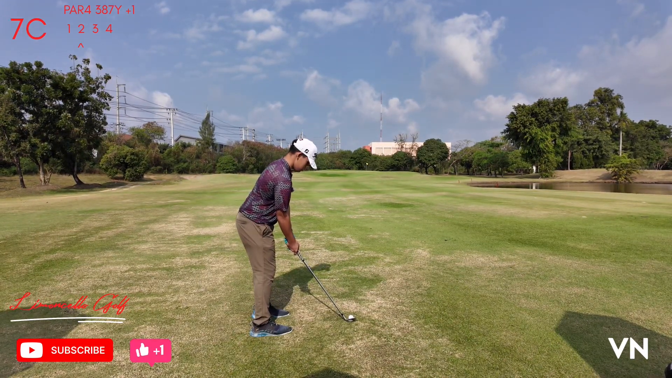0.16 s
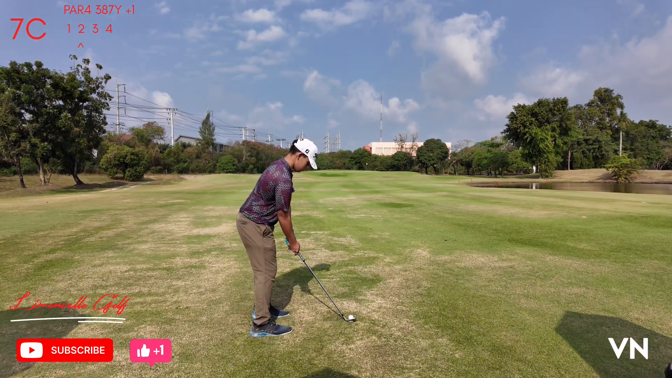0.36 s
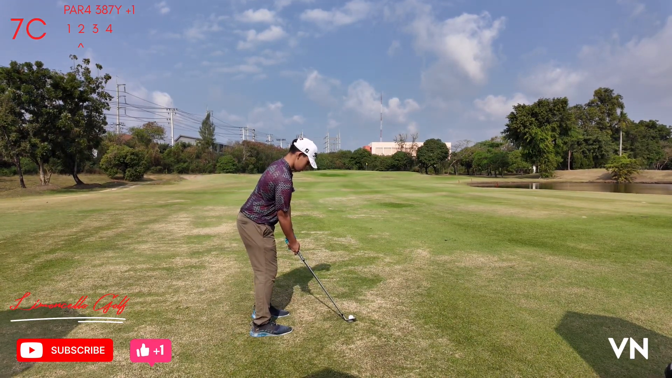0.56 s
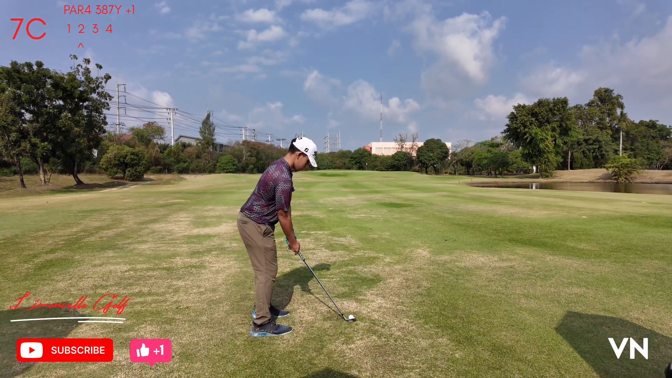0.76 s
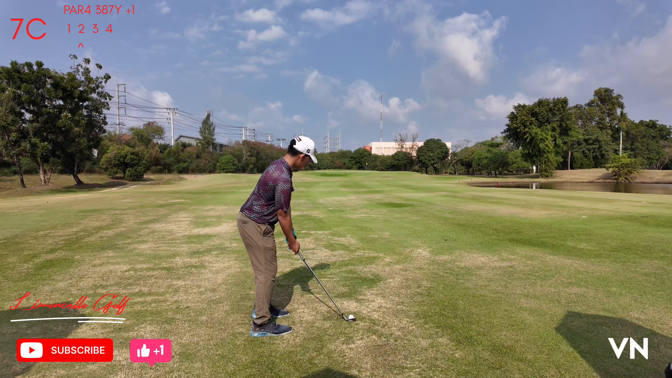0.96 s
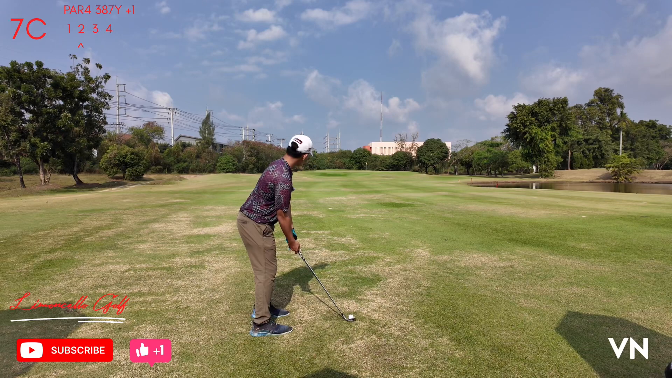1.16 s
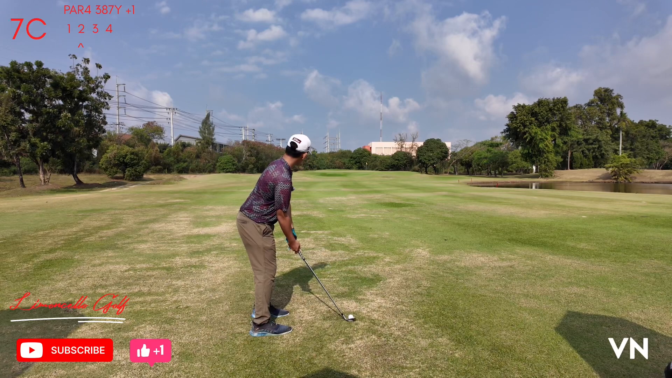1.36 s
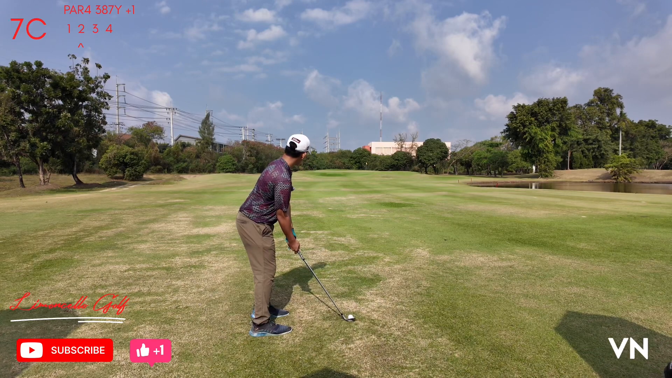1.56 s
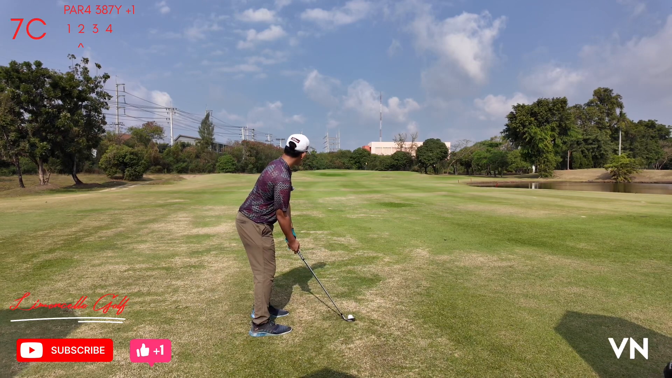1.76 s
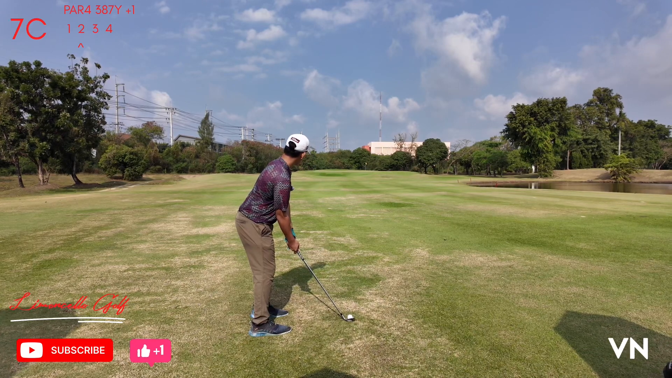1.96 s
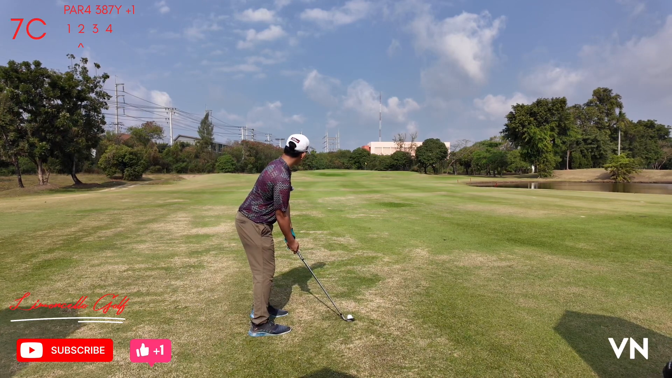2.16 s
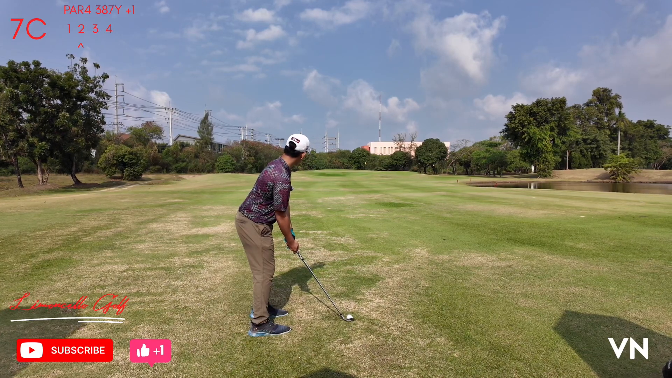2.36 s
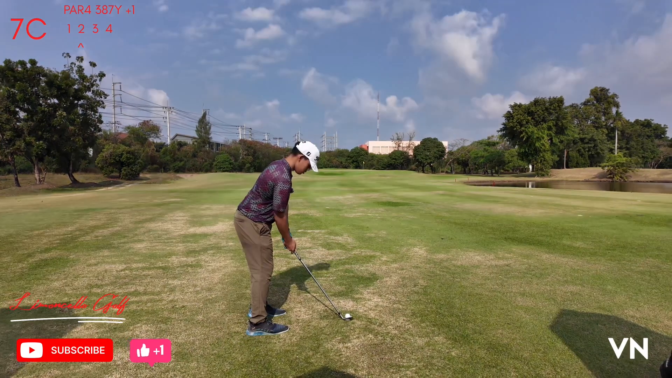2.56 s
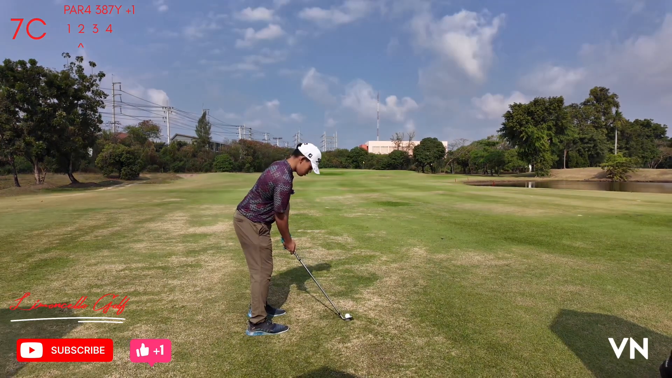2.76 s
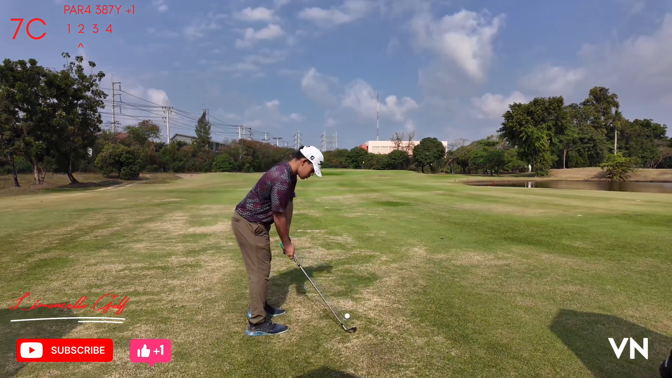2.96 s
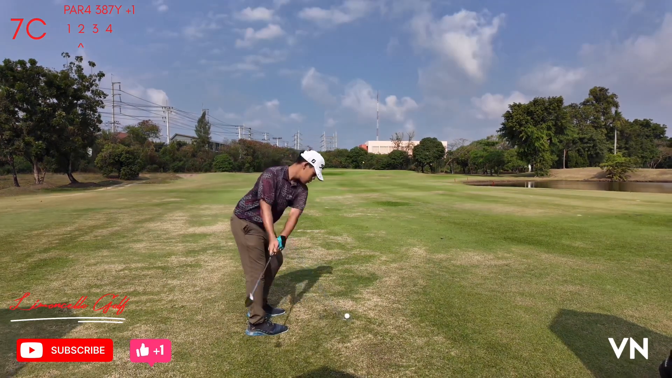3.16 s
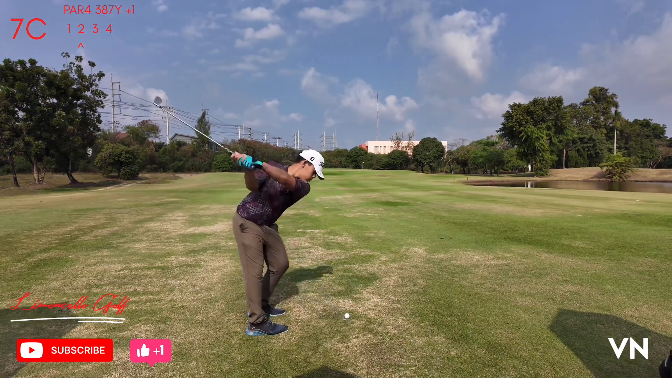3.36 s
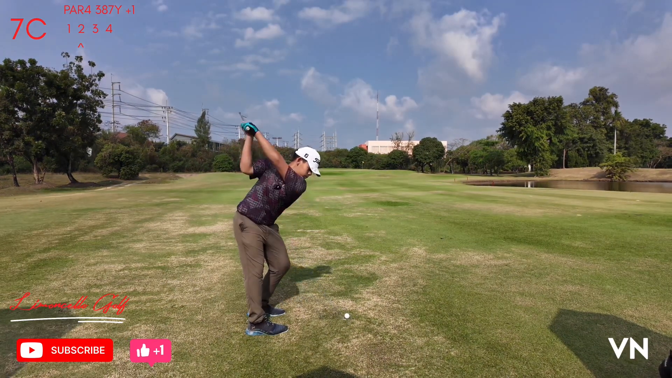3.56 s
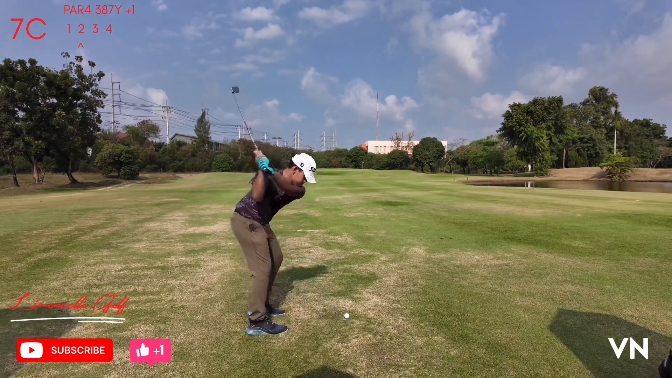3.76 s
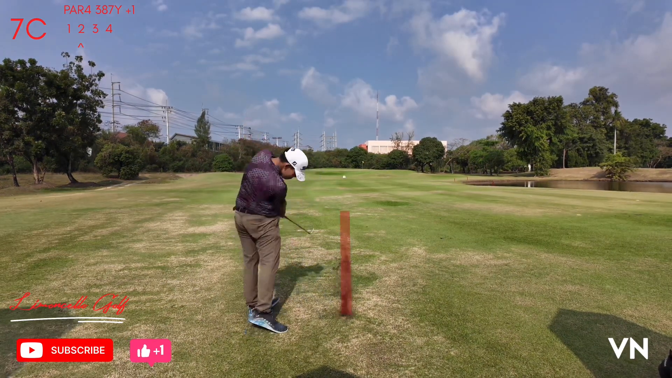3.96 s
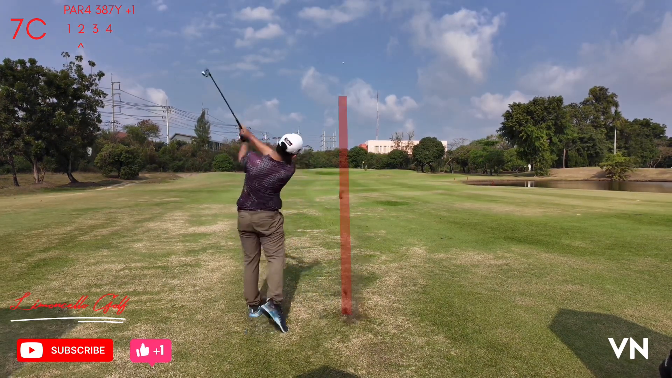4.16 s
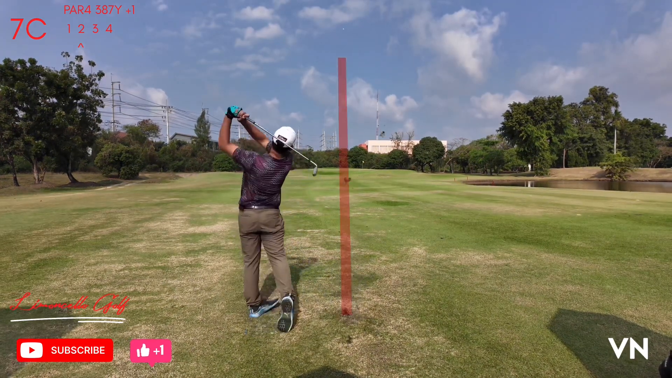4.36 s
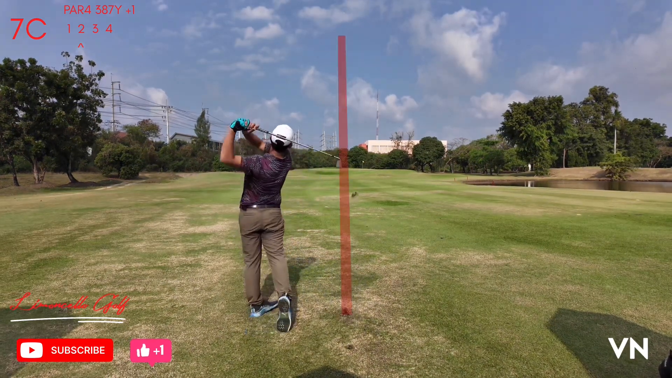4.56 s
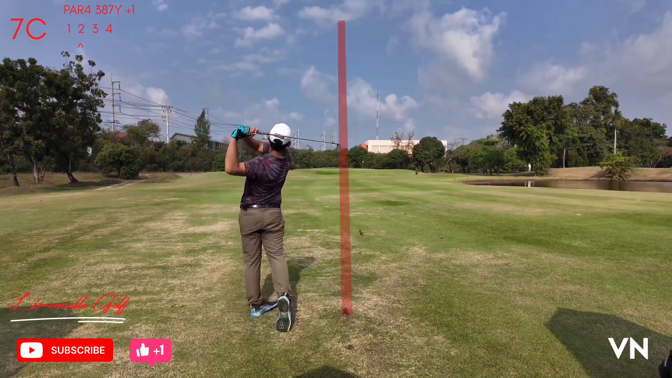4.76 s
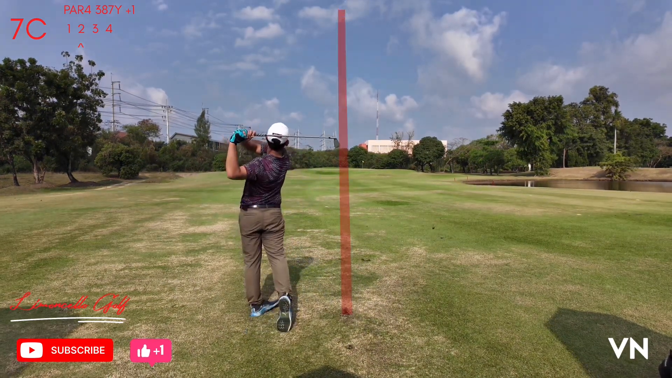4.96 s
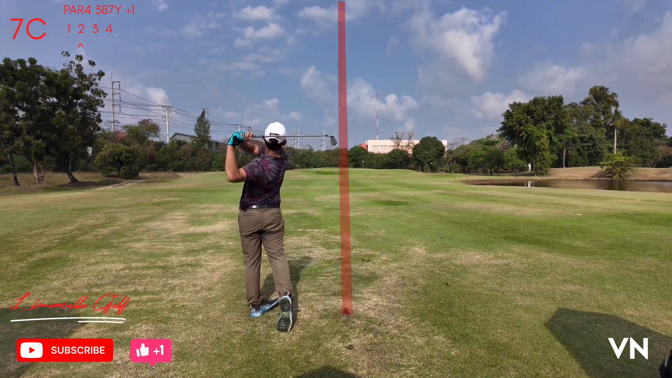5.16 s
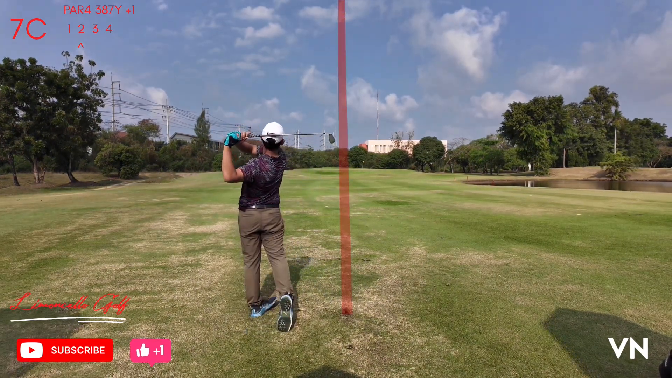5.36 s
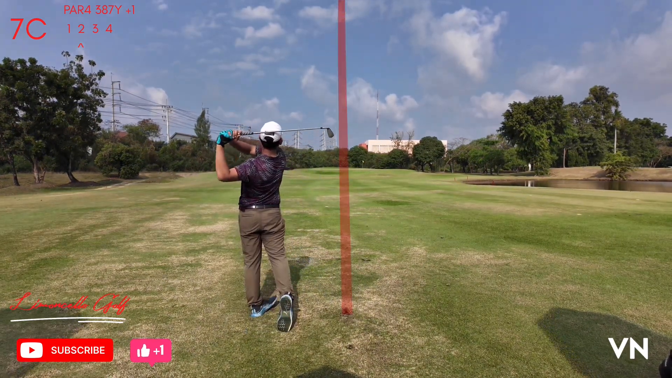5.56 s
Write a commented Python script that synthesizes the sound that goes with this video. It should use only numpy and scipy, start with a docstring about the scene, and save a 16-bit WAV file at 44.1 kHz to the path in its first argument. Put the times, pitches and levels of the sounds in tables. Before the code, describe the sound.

A golf iron swishes and cracks a ball off turf, after faint birdsong and a distant engine drone outdoors.

```python
"""On a golf fairway, wind and far traffic murmur, birds chirp, and a far engine drones, then slows.
The sound drops out for a moment and comes back quieter; a far roar and machine hums swell in.
Clothes rustle, and the club's shaft whistles as it sheds swirls of air on its way down.
The iron head rings briefly as it cracks the ball and cuts the turf.
Last, a clod thuds onto the grass and shoes scuff."""
import sys
import numpy as np
from scipy import signal
from scipy.io import wavfile
from scipy.ndimage import uniform_filter1d

SR = 44100
rng = np.random.default_rng(int(sys.argv[2]) if len(sys.argv) > 2 else 0)


def to_wav(sig):
    """Store sig (one row per channel, or 1-D mono) as 16-bit WAV at the path in sys.argv[1].

    Samples outside -1..1 are clipped; the rate is SR.
    """
    pcm = np.clip(np.atleast_2d(sig), -1, 1) * 32767
    pcm = np.round(pcm).astype(np.int16)
    wavfile.write(sys.argv[1], SR, pcm.T)  # frames by channels


N = 247401
DROP_S, BACK_S = 2.398, 2.446  # the sound drops out, then comes back
# tone colour shared by the swing's whoosh and the scuffs (pitch [Hz], level [dB])
DULL_COLOUR = [(59, -33), (100, -7), (273, -3.5), (377, -3), (538, -3), (829, -16.5), (2260, -24),
               (4000, -34.5), (5200, -63), (8800, -120)]


def amp(db):
    """Turns decibels into a number to multiply a sound by."""
    return 10 ** (np.asarray(db) / 20)


def unit_level(x):
    """Scales a signal so that its average strength (rms) is 1."""
    return x / np.sqrt(np.mean(x ** 2) + 1e-20)


def add(mix, start_s, sound):
    """Lays a sound into the mix at its start time."""
    part = mix[round(start_s * SR):][:len(sound)]
    part += sound[:len(part)]


def wander(span_s):
    """A smooth random wobble; a longer span makes it slower."""
    size = max(int(span_s * SR), 1)
    return unit_level(uniform_filter1d(uniform_filter1d(rng.standard_normal(N), size), size))


def noise(colour, patchy_db, flicker_db):
    """Noise of a given tone colour: patches of pitch come and go, and the whole level flickers."""
    frames, hz = N // 256 + 5, np.fft.rfftfreq(1024, 1 / SR)
    real, imag, patches = rng.standard_normal((frames, 513, 3)).T
    patches = unit_level(uniform_filter1d(uniform_filter1d(patches, size=12, axis=0), size=14, axis=1))
    points_hz, points_db = np.transpose(colour)
    colour_db = np.interp(np.log(hz + 1), np.log(points_hz + 1), points_db)[:, None]
    gain = amp(colour_db + patchy_db * patches + flicker_db * rng.standard_normal(frames))
    return unit_level(signal.istft((real + 1j * imag) * gain, nperseg=1024, noverlap=768)[1][:N])


def clumped(sound, depth_db, span_s):
    """Breaks a steady sound into small random clumps."""
    return unit_level(sound * amp(depth_db * wander(span_s)))


def swells(rows):
    """A loudness curve: each row rises until its time, holds, then fades."""
    t = np.arange(N) / SR
    gains = (amp(db - rise * np.maximum(s - t, 0) - fade * np.maximum(t - s - hold, 0))
             for s, hold, db, rise, fade in rows)
    return np.sqrt(sum(gain ** 2 for gain in gains))


def echoes(sound, length_s, fade_s, gap_s=0):
    """A blur of many tiny echoes that fall by 60 dB in fade_s."""
    t = np.arange(int(length_s * SR)) / SR
    tail = rng.standard_normal(len(t)) * amp(-60 * t / fade_s) * (t >= gap_s)
    return signal.fftconvolve(sound, tail / np.linalg.norm(tail))[:N]


def open_air():
    """Wind in trees and far traffic make a steady murmur, quieter after the dropout."""
    # tone colour before and after the dropout (pitch [Hz], level [dB])
    early_colour = [(15, -51), (25, -30), (64, -6), (110, -6), (227, -12), (267, -17), (306, -17),
                    (553, -10), (974, -14.5), (1140, -12.5), (2130, -22.5), (3450, -27.5), (4400, -39.5),
                    (7140, -47.5), (15600, -57.5)]
    calm_colour = [(21, -38.5), (35, -8.5), (70, -1), (110, -2.5), (177, 0), (217, -3), (318, -13.5),
                   (528, -4), (715, -9), (812, -9.5), (1970, -23), (2180, -19.5), (5040, -34),
                   (5580, -33.5), (15000, -52)]
    early = amp(-45.5) * noise(early_colour, patchy_db=.93, flicker_db=.4)
    calm = amp(-62) * noise(calm_colour, patchy_db=1.1, flicker_db=.4)
    return np.where(np.arange(N) / SR < BACK_S, early, calm)


def far_roar():
    """A far roar of noise swells in after the dropout."""
    # tone colour (pitch [Hz], level [dB])
    colour = [(150, -41), (250, -10.5), (312, -13), (391, -5), (419, -10.5), (488, -3.5), (523, -3),
              (1040, 0), (2600, -17), (3440, -21.5), (3840, -23), (5150, -36), (7000, -40.5), (9100, -67.5),
              (15400, -120)]
    # loudness curve (time [s], level [dB])
    loudness = [(2.45, -69), (2.82, -62), (2.97, -71), (3.5, -58), (3.95, -61), (4.1, -59.5), (4.4, -57),
                (4.87, -54.5), (5.61, -54)]
    times, levels = np.transpose(loudness)
    t = np.arange(times[0], times[-1], 1 / SR)
    gain = amp(np.interp(t, times, levels)) * signal.windows.tukey(len(t), .01)
    out = np.zeros(N)
    add(out, times[0], gain * noise(colour, patchy_db=1.2, flicker_db=.4)[:len(t)])
    return out


def far_tone(hz, gain, flutter_db=1.5):
    """A pure tone that flutters on its long way through the air."""
    turns = np.cumsum(hz) / SR + rng.random() + .055 * wander(.05)
    return np.sqrt(2) * gain * amp(flutter_db * wander(.04)) * np.sin(2 * np.pi * turns)


def far_engine():
    """An engine drones at multiples of its firing rate (harmonics); their balance shifts as it slows."""
    # harmonics 1 and up (level working [dB], level coasting [dB], level after the dropout [dB])
    harmonics = [(-53.5, -59, -75.5), (-50.5, -50, -72.5), (-55, -44, -74.5), (-53, -53, -70),
                 (-67, -67, -78), (-65.5, -70, -85)]
    # one harmonic swells or sinks for a while (harmonic number, middle [s], length [s], change [dB])
    wavers = [(4, 0.069, 0.4, 10.5), (2, .15, 0.25, 8.5), (2, 0.42, 0.27, 4.5), (2, 0.635, .3, -15),
              (1, .5, .5, 3), (4, 0.67, 0.59, 8.5), (5, 0.17, 1, 6), (3, 0.86, .5, 3.5), (2, 0.99, .7, 7),
              (1, 1.2, .4, -6), (4, 1.15, 0.28, 3.5), (1, 1.52, .3, 3), (3, 1.66, 0.27, 2),
              (3, 1.93, 0.44, 2), (3, 2.13, 0.22, -9), (4, 2.33, 0.13, 8), (4, 2.97, 1.37, 6.5),
              (4, 5., 0.74, 5.5), (4, 6.2, .3, 5)]
    ease_off_s, slowing_s = 1.53, .3
    t = np.arange(N) / SR
    since_ease = np.maximum(t - ease_off_s, 0)
    cruise_hz, idle_hz = 56.9 - .9 * t, 46.1 + .78 * since_ease
    cruising = np.exp(-(since_ease / slowing_s) ** 1.35)
    firing_hz = cruising * cruise_hz + (1 - cruising) * idle_hz
    coasting = np.clip(since_ease / .086, 0, 1)
    out = np.zeros(N)
    for number, (work_db, coast_db, later_db) in enumerate(harmonics, 1):
        db = np.where(t < BACK_S, work_db + (coast_db - work_db) * coasting, later_db)
        for which, middle_s, length_s, change_db in wavers:
            if which == number:
                db += change_db * np.cos(np.pi * np.clip((t - middle_s) / length_s, -.5, .5)) ** 2
        out += far_tone(number * firing_hz, amp(db))
    return out


def far_machines():
    """Other far machines hum at nearly steady pitches after the dropout."""
    # hums (time [s], hold [s], level [dB], rise [dB/s], fade [dB/s], pitch [Hz], drift [Hz/s])
    hums = [(4.45, .65, -62.5, 14, 25, 115.5, 1), (4.9, .7, -67.5, 10, 10, 58., 0),
            (3.55, .35, -64.5, 32, 20, 167., 8), (4.4, .5, -70, 20, 20, 175., 3),
            (3.3, .55, -62.5, 30, 14, 97.5, 1), (3.55, .4, -69, 50, 25, 391., 6),
            (5.0, .6, -71.5, 30, 10, 394., 2), (4.75, .4, -68, 25, 45, 485., 20)]
    t = np.arange(N) / SR
    return sum(far_tone(hz + drift * (t - swell[0]), swells([swell]) * (t > BACK_S))
               for *swell, hz, drift in hums)


def bird_note(hz, db, soft_share):
    """A bird's whistle: a gliding pure tone with soft ends."""
    envelope = np.sqrt(2) * amp(db) * signal.windows.tukey(len(hz), soft_share)
    return envelope * np.sin(2 * np.pi * np.cumsum(hz) / SR)


def birds():
    """Chirps and high calls flutter in the air and echo from the trees."""
    # short notes (time [s], length [s], start pitch [Hz], middle pitch [Hz], end pitch [Hz], level [dB])
    chirps = [(.03, .075, 5350, 5150, 4550, -76), (.215, .075, 4100, 4150, 4250, -69),
              (.468, .03, 4700, 5400, 5250, -68), (.905, .02, 5500, 5350, 5200, -74),
              (1.202, .018, 4200, 4000, 3800, -62), (1.258, .06, 3750, 4050, 3800, -64.5),
              (1.265, .055, 3450, 3750, 3550, -64), (1.33, .03, 3600, 3550, 3450, -67.5),
              (1.36, .02, 5300, 4900, 4600, -70), (1.405, .025, 3550, 3600, 3550, -67.5),
              (1.482, .025, 5600, 5000, 4900, -70), (1.528, .03, 3750, 3800, 3550, -63),
              (1.845, .06, 4000, 4200, 4350, -71), (1.96, .12, 3600, 3750, 4100, -66),
              (2.448, .025, 2900, 2900, 2900, -77), (2.52, .075, 4750, 3900, 3200, -81),
              (2.595, .03, 2700, 2850, 2900, -77), (2.74, .1, 1480, 1500, 1540, -69),
              (2.755, .06, 5600, 5100, 4500, -83.5), (2.835, .09, 5500, 4800, 3600, -84),
              (2.985, .16, 3050, 3300, 3580, -74.5), (3.218, .058, 3700, 3950, 3400, -76),
              (3.335, .07, 3650, 3450, 3100, -75)]
    # calls that flick up, then slide down (time [s], length [s], top [Hz], end [Hz], level [dB])
    high_calls = [(.158, .157, 6920, 6100, -66.5), (4.488, .105, 7070, 5700, -85),
                  (4.733, .105, 7020, 5750, -82)]
    flick_s, flick_hz, call_fade_db = .03, 1300, -9
    song = np.zeros(N)
    for start_s, length_s, *pitches, db in chirps:
        curve = np.polyfit([0, .5, 1], pitches, deg=2)
        hz = np.polyval(curve, np.linspace(0, 1, int(length_s * SR)))
        add(song, start_s, bird_note(hz, db, soft_share=.28))
    for start_s, length_s, top_hz, end_hz, db in high_calls:
        t = np.arange(0, length_s, 1 / SR)
        flick = np.maximum(1 - t / flick_s, 0) ** 3
        slide = np.maximum(t - flick_s, 0) / (length_s - flick_s)
        hz = top_hz - flick_hz * flick - (top_hz - end_hz) * slide ** 1.4
        fading_db = db + call_fade_db * np.minimum(2 * slide, 1) ** 3
        add(song, start_s, bird_note(hz, fading_db, soft_share=.2))
    song *= amp(2.3 * wander(.004))
    return song + amp(-6) * echoes(song, length_s=.2, fade_s=.15)


def far_chatter():
    """Far birds or insects blur into swells of high noise."""
    # tone colour (pitch [Hz], level [dB])
    colour = [(2600, -37), (2950, -3), (3300, -2), (3650, -6), (4100, -13.5), (4900, -13), (5600, -44)]
    # two swells before the dropout, two after (time [s], hold [s], level [dB], rise [dB/s], fade [dB/s])
    bouts = [(.6, 0.027, -60.5, 23, 64), (1.3, .2, -64.5, 10, 15), (2.76, 0.11, -72.5, 23, 150),
             (3.7, .15, -72, 25, 7)]
    gain = np.where(np.arange(N) / SR < BACK_S, swells(bouts[:2]), swells(bouts[2:]))
    return gain * clumped(noise(colour, patchy_db=2.5, flicker_db=1.5), depth_db=1.3, span_s=.01)


def rustle():
    """Cloth and grass hiss, sleeves and flying grass fizz, torn turf and twisting shoes scuff."""
    # tone colours (pitch [Hz], level [dB])
    hiss_colour = [(710, -33.5), (1200, -4.5), (1350, -11), (1930, -16), (2890, -11.5), (3910, -16),
                   (6440, -17.5), (14000, -39), (16000, -62)]
    fizz_colour = [(3000, -30), (5500, -2), (7000, -0.5), (9000, -10), (13000, -19.5), (16000, -36)]
    # movements (time [s], hold [s], level [dB], rise [dB/s], fade [dB/s])
    hisses = [(.596, .03, -67, 80, 80), (2.76, 0.11, -88, 64, 200), (3.0, .02, -74, 150, 250),
              (3.17, .1, -75, 120, 50), (3.43, .2, -76.5, 60, 40.5), (3.76, .12, -68.5, 70, 100),
              (3.929, 0.033, -54, 500, 600.5), (3.976, .001, -37, 1899.5, 1502),
              (3.99, .002, -54.5, 900, 420), (4.02, 0.031, -62, 300.5, 270), (4.14, 0.12, -62, 130, 250),
              (4.29, .04, -68.5, 301, 100)]
    fizzes = [(3.22, .08, -79, 80, 80), (3.95, .025, -63, 300, 300), (4.03, 0.029, -70.5, 200, 500),
              (4.16, .1, -76, 150, 300)]
    scuffs = [(3.992, 0.0065, -42, 1500.5, 699.5), (4.012, .01, -51, 900.5, 250),
              (4.135, 0.086, -53, 219.5, 98), (4.225, 0.038, -52, 250, 280)]
    hiss = clumped(noise(hiss_colour, patchy_db=1, flicker_db=.9), depth_db=1.8, span_s=.002)
    scuff = clumped(noise(DULL_COLOUR, patchy_db=2.1, flicker_db=1.7), depth_db=4.8, span_s=.0024)
    fizz = clumped(noise(fizz_colour, patchy_db=1.5, flicker_db=.9), depth_db=1.8, span_s=.002)
    return swells(hisses) * hiss + swells(fizzes) * fizz + swells(scuffs) * scuff


def dry_ticks():
    """Tiny dry snaps, each only a few vibrations long."""
    # snaps (time [s], level [dB], pitch [Hz])
    ticks = [(3.25, -54, 7000.), (3.5165, -52, 5000.), (3.8, -60, 6000.), (4.1443, -45.5, 3000.),
             (4.205, -59, 4000.), (4.272, -58, 5920), (4.335, -55, 4000.), (4.348, -57, 3510)]
    out = np.zeros(N)
    for start_s, db, hz in ticks:
        turns = hz * np.arange(100) / SR
        add(out, start_s, amp(db) * np.sin(2 * np.pi * turns) * turns * np.exp(1 - turns))
    return out


def ground_thuds():
    """Clods and feet give the ground a short, low push with a snap at its front."""
    # landings (time [s], level [dB], pitch [Hz], length [cycles], snap compared with push [dB])
    thuds = [(3.97, -33, 79.9, 1.36, -20), (4.0003, -28, 595, 1.1, -24.5), (4.0945, -40, 200., 1.5, -18),
             (4.1311, -33, 110, 1.44, 0), (4.1443, -16.5, 102.4, 1.58, -3), (4.2215, -36, 320, 2.4, 3.5),
             (4.259, -42, 330., 1, -15)]
    out = np.zeros(N)
    for start_s, db, hz, cycles, snap_db in thuds:
        t = np.arange(int(cycles / hz * SR)) / SR
        envelope = signal.windows.tukey(len(t), .7) * amp(-3.5 * hz * t)
        push = -np.sin(2 * np.pi * hz * t + .6) * envelope
        snap = -amp(snap_db) * (t / .0008) ** 2 * np.exp(2 - 2 * t / .00073)
        add(out, start_s, amp(db) * (push + snap))
    return out


def club_swing():
    """Swirls of air off the shaft whistle inside a whoosh; the pitch follows the club's speed."""
    top_s, dig_s, speedup_s, brake_s = 3.957, 3.9765, .028, .0046
    slow_hz, top_hz, dig_hz, braked_hz = 240, 660, 683, 208
    # (time [s], hold [s], level [dB], rise [dB/s], fade [dB/s])
    dig_gain = swells([(dig_s, .0049, -21, 3000, 2300)])
    whoosh_gain = swells([(3.938, .017, -41, 230, 300.5)])
    t = np.arange(N) / SR
    in_air = t < dig_s - .003
    rising_hz = slow_hz + (top_hz - slow_hz) * np.exp(np.minimum(t - top_s, 0) / speedup_s)
    whistle_db = -32 + 70 * np.log2(rising_hz / top_hz) - 450 * np.maximum(t - top_s, 0)
    whistle_gain = amp(whistle_db) * (in_air & (t > top_s - .1))
    # the head digs in: a louder tone that drops as the turf brakes it
    braking_hz = braked_hz + (dig_hz - braked_hz) * np.exp(-(np.maximum(t - dig_s, 0) / brake_s) ** 3.5)
    hz = np.where(in_air, rising_hz, braking_hz) * (1 + .048 * wander(.003))
    tone = np.sqrt(2) * (whistle_gain + dig_gain) * np.sin(2 * np.pi * np.cumsum(hz) / SR)
    return tone + whoosh_gain * noise(DULL_COLOUR, patchy_db=1.5, flicker_db=3.2)


def club_strikes():
    """Each blow makes the iron head ring briefly; how long the contact lasts picks which tones sound."""
    # ringing tones of head and ball (pitch [Hz], level [dB], time to fade by 60 dB [s])
    tones = [(940, 2.6, .0049), (1560, -15.3, .0038), (2370, 3.2, .0055), (2970, -3.2, .009),
             (4020, 1.9, .0047), (4650, 6., .0026), (5250, -11., .005), (6500, -8.5, .006),
             (8420, -23.4, .0071), (11280, -22.4, .0049), (13750, -12.5, .0045)]
    # blows from ball, turf and grit (time [s], level [dB], favoured pitch [Hz], spread [octaves])
    blows = [(3.9285, -40.5, 2280, 1.2), (3.9515, -42.5, 2640, 1.46), (3.96, -42, 2090, .6),
             (3.9692, -4.6, 840., .84), (3.9698, -1.8, 1920., .81), (3.97147, 2.7, 6560., .76),
             (3.9735, -12.1, 4050., .46), (3.97587, -17.7, 5530., 1.52), (3.992, -32, 2994, 0.43),
             (3.9948, -33.5, 3200., .5)]
    t = np.arange(1500) / SR
    rise = 1 - np.exp(-t / .00025)
    out = np.zeros(N)
    for start_s, db, favoured_hz, spread in blows:
        for hz, tone_db, fade_s in tones:
            contact_db = -6 * (np.log2(hz / favoured_hz) / spread) ** 2
            envelope = rise * amp(db + tone_db + contact_db - 60 * t / fade_s)
            add(out, start_s, -envelope * np.sin(2 * np.pi * hz * t))
    return out


def scene():
    """The golf shot over the outdoor background; its sharp sounds scatter off the grass."""
    sharp = club_strikes() + dry_ticks()
    shot = club_swing() + sharp + ground_thuds()
    off_grass = amp(-20) * echoes(sharp, length_s=.1, fade_s=.032, gap_s=.002)
    golfer = shot + off_grass + rustle()
    background = open_air() + far_roar() + far_engine() + far_machines() + birds() + far_chatter()
    return (golfer + background)[None]


def record(dry):
    """The small microphone loses the deepest bass; the sound drops out briefly; the top treble is cut."""
    bass_hz, treble_hz, fade_in_s = 32, 16500, .014
    t = np.arange(N) / SR
    dying_trace = amp(-33 - 700 * np.maximum(t - DROP_S, 0)) * (t < DROP_S + .027)
    fade_in = np.clip((t - BACK_S) / fade_in_s, 0, 1) ** 2
    dropout = np.where(t < DROP_S, 1, np.maximum(dying_trace, fade_in))
    bass_cut = signal.butter(2, bass_hz, "high", fs=SR, output="sos")
    treble_cut = signal.firwin(511, treble_hz, window=("kaiser", 9), fs=SR)
    return signal.oaconvolve(signal.sosfiltfilt(bass_cut, dry) * dropout, treble_cut[None], "same")


dry = scene()
out = record(dry)
to_wav(out)
```